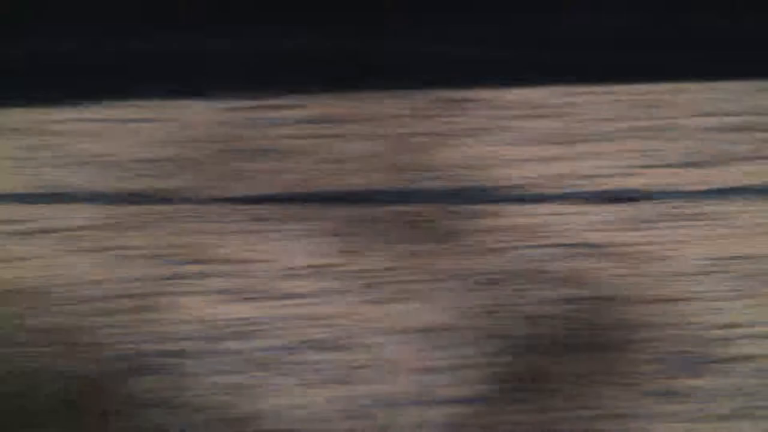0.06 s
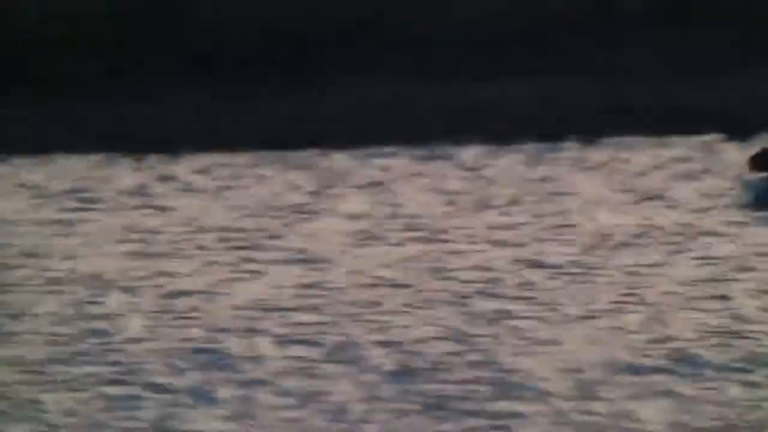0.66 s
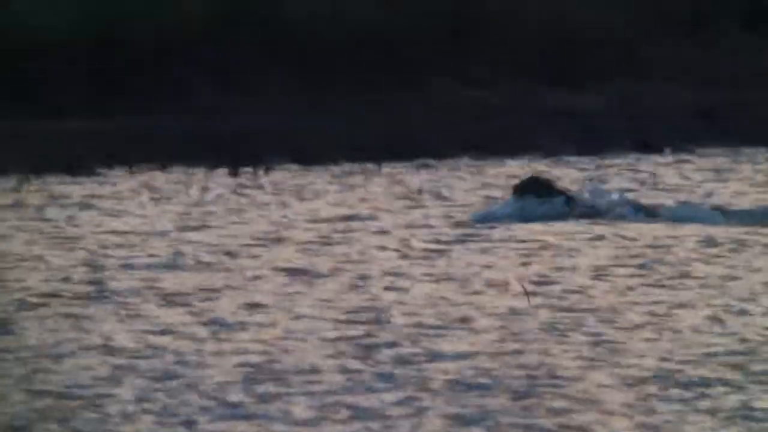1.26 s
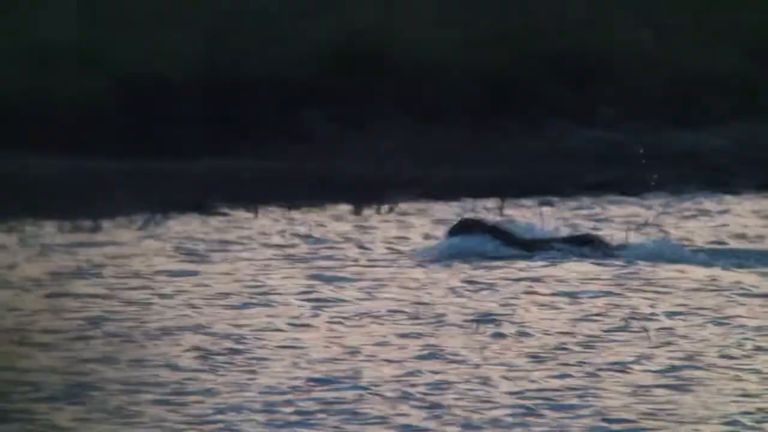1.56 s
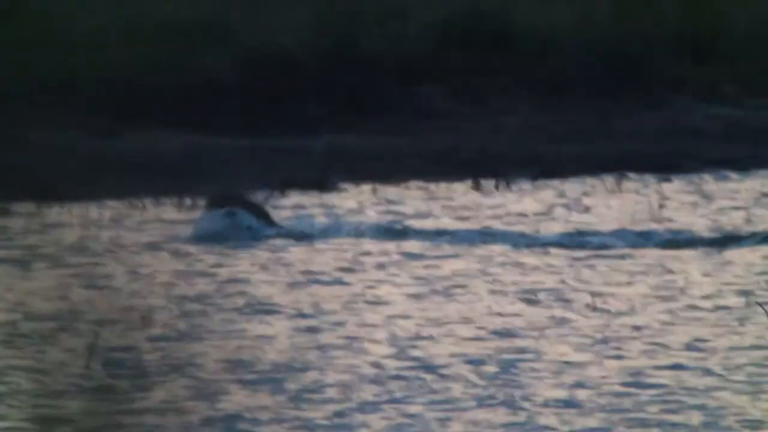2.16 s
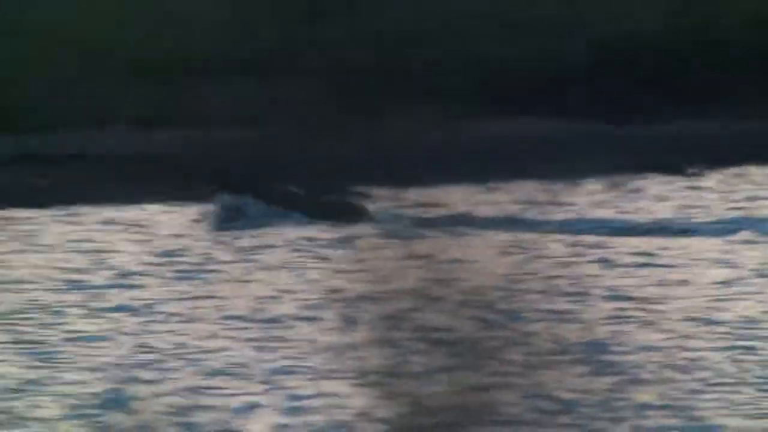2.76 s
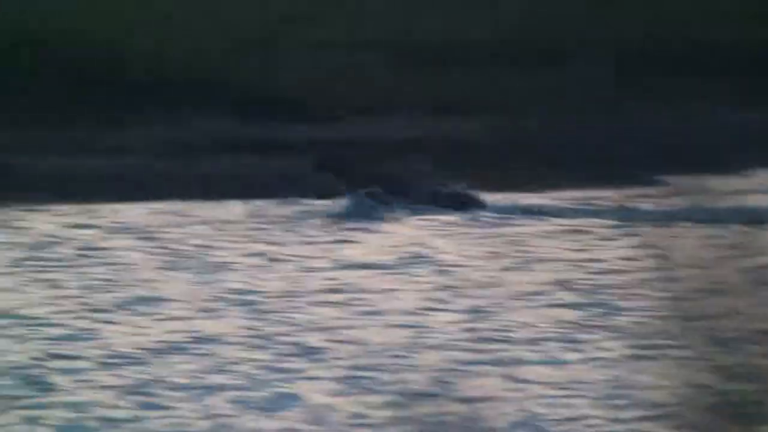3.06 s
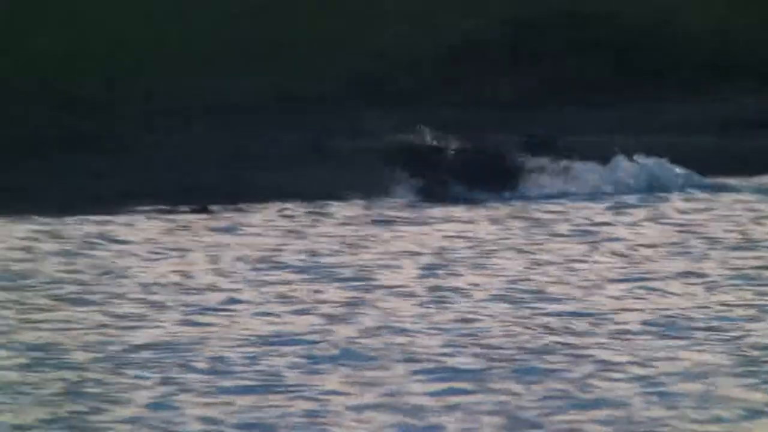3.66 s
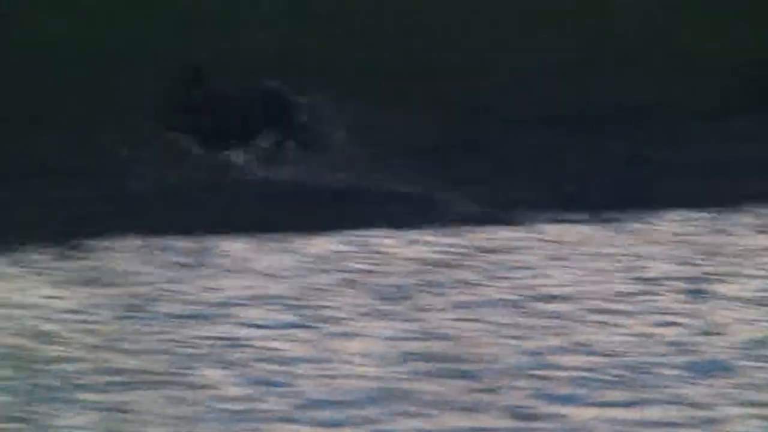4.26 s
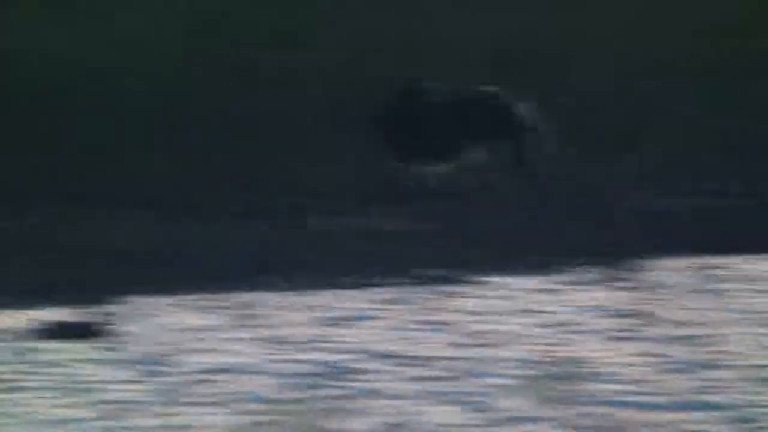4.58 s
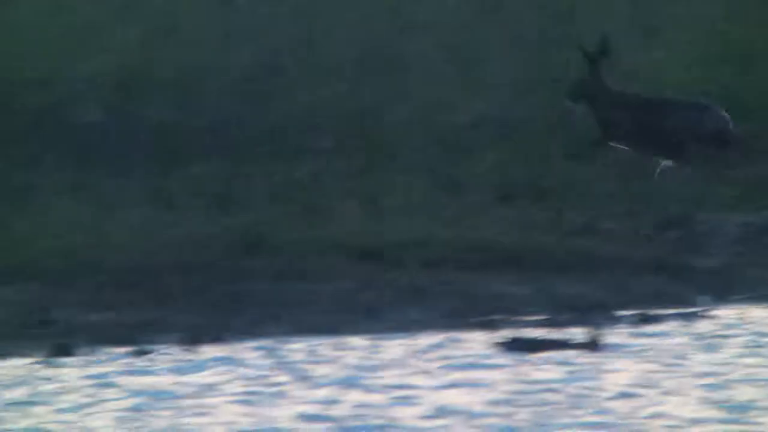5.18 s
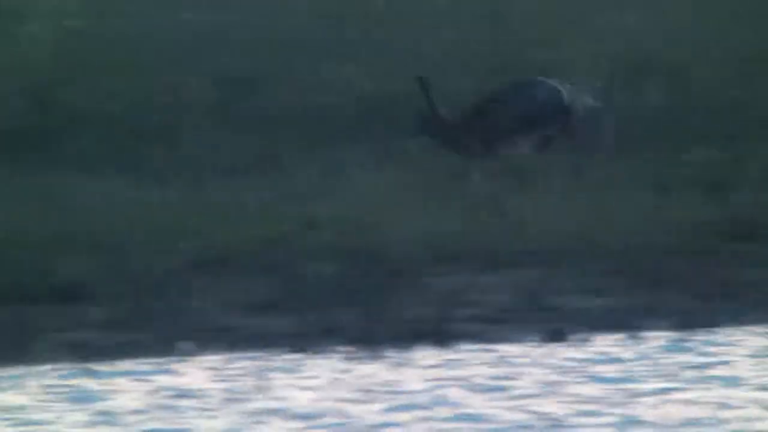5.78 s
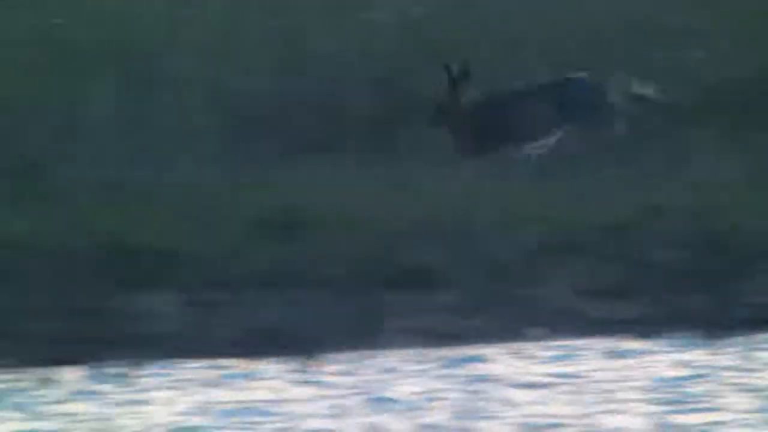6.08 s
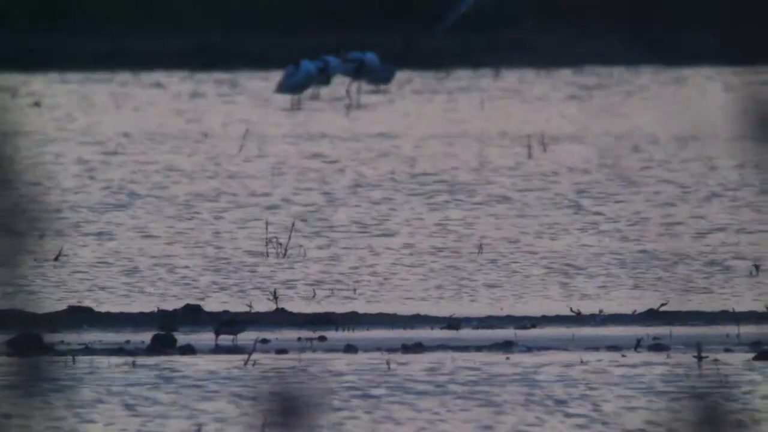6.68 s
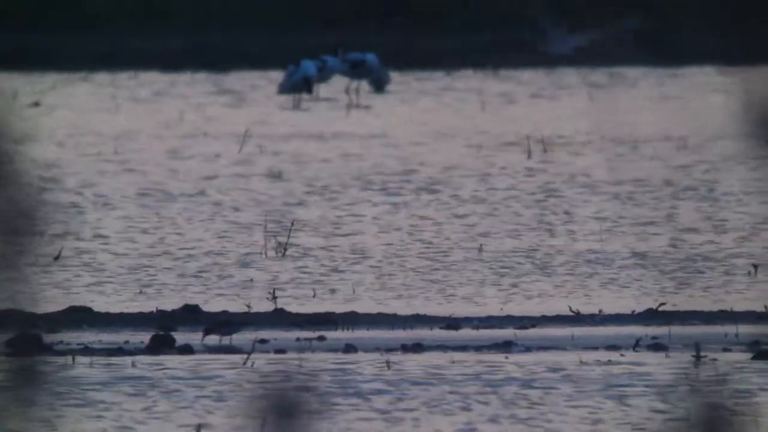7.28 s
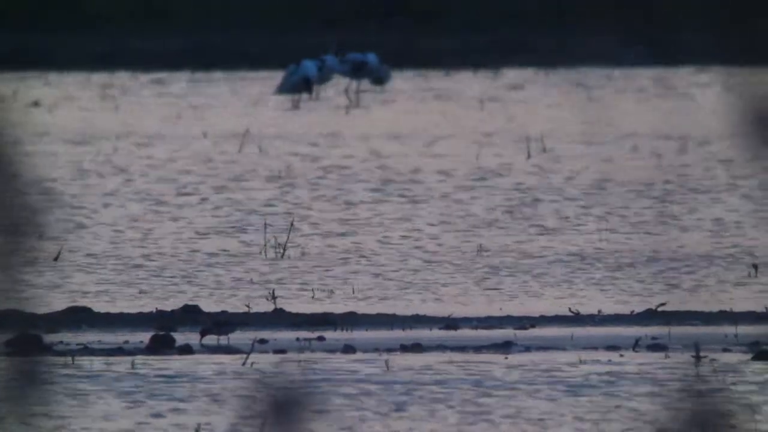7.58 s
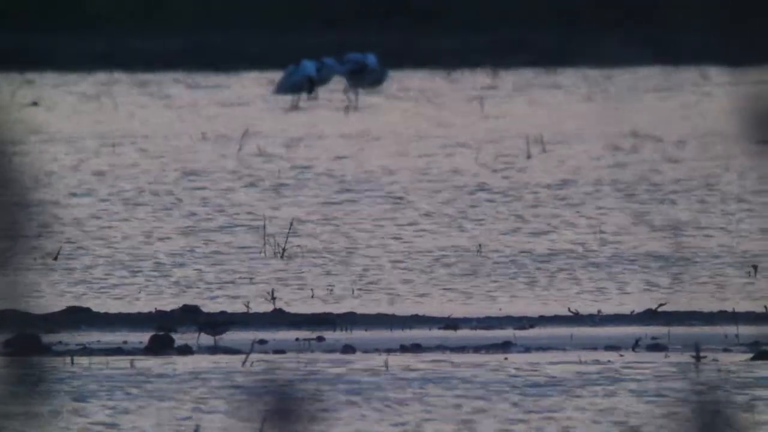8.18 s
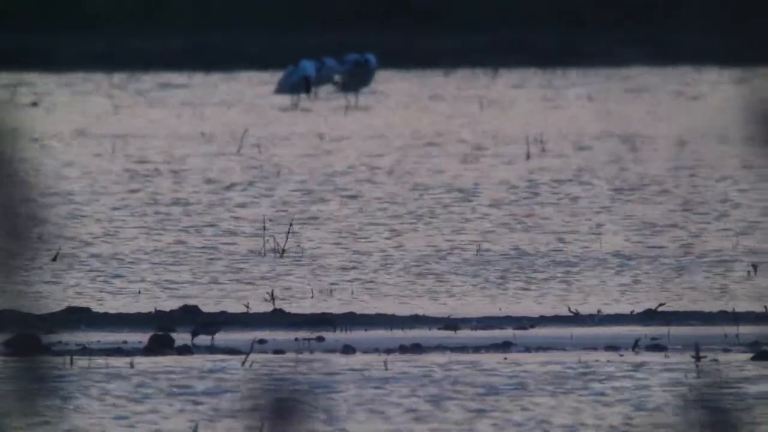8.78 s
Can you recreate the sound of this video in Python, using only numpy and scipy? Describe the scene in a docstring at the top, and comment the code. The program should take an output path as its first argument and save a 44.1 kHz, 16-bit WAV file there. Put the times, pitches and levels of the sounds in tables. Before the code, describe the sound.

The sound fades in on a lake shore with a steady low rumble, faint hiss and a distant chorus of toads, a few soft trills standing out. From the start until about 2.6 seconds, a wading bird gives six short, pure, rising whistles, roughly half a second apart. Wind buffets the microphone from 1.3 to 4.2 seconds with a low roar and fluttering thumps, the loudest part; a few weaker thumps follow until 6 seconds. A tiny tick comes near 1.9 seconds. Faint bird calls sound far off around 4 and 5 seconds. Just after 6 seconds the sound cuts out and quickly fades back in. The toads are now much nearer: two trade short, pulsing trills on the left over a louder chorus until the end, around 9 seconds. Distant water birds cry hoarsely near 6.8 and 7.5 seconds, among faint, thin pips from small birds.

```python
"""Toads at a lake at dusk

Toads trill along the shore, each pulse making a throat sac ring. A wading bird gives six rising
whistles, and other birds call far off. Gusts buffet the microphone over a distant rumble and faint hiss.
The sound fades in, later cuts out and fades in again; after that the toads are much nearer."""
import sys
import numpy as np
from scipy import signal
from scipy.fft import rfft, irfft, next_fast_len
from scipy.io import wavfile
from scipy.ndimage import uniform_filter1d, map_coordinates

SR = 44100
rng = np.random.default_rng(int(sys.argv[2]) if len(sys.argv) > 2 else 0)


def output_pcm(signal):
    """Save a mono or channel-first signal as 16-bit PCM at the path in sys.argv[1].

    Samples are clipped to [-1, 1] before scaling.
    """
    pcm = np.clip(np.atleast_2d(signal).T, -1, 1) * 32767
    wavfile.write(sys.argv[1], SR, np.round(pcm).astype(np.int16))


N = 398663

# Levels in the tables are relative: the functions add their own gains.
# tone colour of the distant rumble and of the microphone hiss: f/Hz, level/dB
RUMBLE_COLOUR = [(15, -42), (25, -29), (38, -5.5), (60, -2), (80, 2), (113, -4), (155, -7), (220, -12.5),
                 (390, -12.5), (650, -25), (900, -32), (1200, -48.5), (2600, -100)]
HISS_COLOUR = [(400, -2.5), (900, 2), (2400, 4.5), (3800, -0.5), (5200, -0.5), (7000, 1.5), (8200, -0.5),
               (9000, 0), (10000, 0), (11200, -.5), (12800, -2), (14500, -3), (16000, -8)]
# how alike the background is on the left and right: f/Hz, likeness (1 = the same)
LIKENESS = [(130, 1), (290, .97), (640, .8), (1410, .55), (3100, .1), (6800, -.08)]
# the background leans to the right: f/Hz, left minus right/dB
BALANCE = [(200, 0), (380, -1), (700, -2.5), (1300, -3), (4400, -2.5), (8100, -.6), (15000, -1)]
# ringing tones of a tiny hard tick on the camera: f/Hz, level/dB, time to fall 60 dB/s
TICK_TONES = [(2000, -19, 0.0039), (3780, -14, 0.0039), (6160, 0, 0.0019), (7400, 2, 0.0019),
              (9200, -9, 0.0058), (11000, -5, 0.0039), (14500, -4, .003)]
# strength of four gusts, one list each: t/s, level/dB
GUSTS = [
    [(1.3, -49), (1.364, -54), (1.378, -47), (1.53, -36), (1.596, -48), (1.66, -39.5), (1.8, -40.5)],
    [(1.8, -42), (1.838, -31.5), (2.092, -36.5), (2.434, -30), (2.47, -35), (2.94, -37.5), (2.97, -44)],
    [(2.97, -45), (3.04, -30.5), (3.126, -38.5), (3.262, -26.5), (3.296, -31.5), (3.396, -33.5),
     (3.47, -61)],
    [(3.47, -56), (3.512, -35), (3.856, -38), (3.972, -45), (3.998, -34), (4.188, -54), (4.2, -45)],
]
# tone colour of the wind's low roar and of the flutter that strong wind adds: f/Hz, level/dB
ROAR_COLOUR = [(15, -37), (25, -17), (42, -11), (70, 2), (130, 1.5), (200, -3.5), (300, -17), (450, -29),
               (800, -51), (1500, -94)]
FLUTTER_COLOUR = [(70, -23), (150, 3), (260, 0.5), (380, -9), (550, -17), (750, -26), (1000, -39),
                  (2000, -90)]
# single strong eddies (swirls of air): t/s, level/dB, f/Hz
STRONG_EDDIES = [(1.67, -23, 292), (1.737, -21.5, 120), (1.844, -13.5, 174), (1.89, -15, 150),
                 (2.003, -17.5, 180), (2.217, -16, 166), (2.273, -16, 204), (2.304, -16, 274),
                 (2.373, -16, 160), (2.41, -22, 262), (2.544, -18, 236), (2.648, -16, 129),
                 (2.74, -18.5, 129), (3.038, -14, 211), (3.23, -15, 258), (3.256, -11.5, 290),
                 (3.544, -16.5, 168), (3.688, -18.5, 261), (3.74, -17.5, 130), (3.813, -15, 214),
                 (3.996, -18.5, 144), (4.343, -25, 117), (4.76, -27.5, 110), (4.839, -21.5, 129),
                 (4.9, -28.5, 110), (5.63, -29.5, 100), (5.954, -22, 130), (6.023, -23.5, 130)]
# hoarse cries of far water birds: t/s, length/s, first f/Hz, last f/Hz, level/dB
BIRD_CRIES = [(4.012, .12, 1800, 2040, -63), (5.148, 0.176, 2020, 2100, -71),
              (6.6, 0.47, 1143, 1162, -68.5), (6.617, .25, 3880, 3880, -75),
              (6.823, .21, 1986, 1816, -57.5), (7.546, .176, 1866, 1980, -55.5),
              (7.661, 0.29, 2890, 2670, -69.5)]
# thin pips of small birds: t/s, first f/Hz, level/dB
BIRD_PIPS = [(4.83, 3000, -71), (6.058, 3200, -75), (6.754, 3400, -69), (7.355, 5600, -77),
             (7.42, 4900, -75), (8.915, 6050, -75), (8.949, 4700, -75)]
# the wading bird's whistles: t/s, f/Hz at the top of the arch, level/dB
WADER_WHISTLES = [(.11, 2600, -57), (.519, 2584, -52), (.955, 2560, -53), (1.432, 2600, -59.5),
                  (1.959, 2523, -54), (2.536, 2533, -56.5)]
# shape of one whistle: share of its length, pitch ratio, level/dB
WHISTLE_SHAPE = [(0, .66, -22.5), (.12, .72, -11), (.24, .865, -11), (.33, .91, -3.5), (.58, 0.98, -1.5),
                 (.74, 1, 0.5), (.92, .95, -2), (1, 1.16, -12)]
# loudness of the far toads together: t/s, level/dB
CHORUS_LEVEL = [(.2, -66), (3.1, -63), (5, -66), (6.1, -64), (6.3, -59), (6.85, -56), (7.35, -59),
                (7.78, -55), (7.98, -61.5), (8.25, -57), (8.48, -61), (8.75, -57.5), (9.04, -58.5)]
# their tone colour across the water: f/Hz, level/dB
CHORUS_COLOUR = [(700, -21.5), (1150, -14), (1330, -9), (1520, -2), (1720, -3), (1900, -6), (2100, -8.5),
                 (2300, -14), (2850, -16.5), (3500, -18), (4600, -22), (6000, -30.5), (9000, -60)]
# each single toad's voice, by name (middle, deep and high are far off, lead and neighbour near): f/Hz, pulse
# rate/Hz, timing scatter (0-1), left minus right/dB
TOAD_VOICES = {"lead": (1625, 59, .13, 5), "neighbour": (1650, 71, .12, 7.4), "middle": (1596, 69, 0.2, -4),
               "deep": (1522, 68, 0, -5), "high": (1750, 65, 0.1, -4.5)}
# single toads' trills, faint far ones (middle, deep, high) and near ones (lead, neighbour): toad, t/s,
# length/s, level/dB
TOAD_TRILLS = [("middle", .097, .14, -63), ("middle", .386, .25, -67), ("middle", .87, .3, -60),
               ("deep", 1.442, .33, -60.5), ("deep", 2.0, .27, -68.5), ("deep", 2.417, .31, -68.5),
               ("deep", 2.878, .34, -67.5), ("deep", 3.55, 0.28, -67.5), ("high", 2.714, 0.24, -68),
               ("high", 5.127, 0.25, -69), ("high", 5.578, .26, -69), ("lead", 6.298, .05, -51.5),
               ("lead", 6.38, .276, -51), ("lead", 6.859, .18, -50.5), ("lead", 7.058, .128, -50),
               ("lead", 7.389, .37, -51.5), ("lead", 7.958, 0.108, -52.5), ("lead", 8.092, .24, -51),
               ("lead", 8.516, 0.27, -51), ("lead", 8.998, .08, -49), ("neighbour", 6.19, .12, -58.5),
               ("neighbour", 6.621, 0.35, -58.5), ("neighbour", 7.189, .21, -62),
               ("neighbour", 7.72, .18, -57.5), ("neighbour", 8.163, 0.25, -56.5),
               ("neighbour", 8.76, .24, -57)]
# the two fade-ins: t/s, time constant/s
FADES = [(.078, .07), (6.157, .065)]


def amp(db):
    """Turn decibels into a gain."""
    return 10 ** (np.asarray(db) / 20)


def unit(x):
    """Scale x to an average strength (rms) of 1."""
    return x / np.sqrt(np.mean(x ** 2) + 1e-20)


def along(points, hz):
    """Read a table of (f/Hz, value) on a log frequency axis."""
    f, v = np.transpose(points)
    return np.interp(np.log(hz + 1), np.log(f + 1), v)


def wobble(rate, size=N):
    """A smooth curve through `rate` random values a second."""
    return map_coordinates(rng.standard_normal(int(size * rate / SR) + 4), [np.arange(size) * rate / SR])


def filtered(x, response):
    """Scale each frequency in x by response(hz)."""
    size = next_fast_len(N + SR // 4)
    return irfft(rfft(x, size) * response(np.fft.rfftfreq(size, 1 / SR)), size)[..., :N]


def add(track, s, sound, pan_db=0):
    """Mix a sound into a stereo track at time s; positive pan is left."""
    start = max(round(s * SR), 0)
    part = track[:, start:start + sound.shape[-1]]
    part += amp([[pan_db / 2], [-pan_db / 2]]) * sound[..., :part.shape[1]]


def noise(colour, likeness=LIKENESS):
    """Stereo noise with a given tone colour and left-right likeness."""
    def response(hz):
        angle = np.arccos(np.clip(along(likeness, hz), -1, 1)) / 2
        return amp(along(colour, hz)) * [np.cos(angle), np.sin(angle)]
    mid, side = filtered(rng.standard_normal((2, N)), response)
    return unit(np.array([mid + side, mid - side]))


def rumble(db=-45.6):
    """A low, distant noise that wavers a little."""
    return amp(db + .45 * wobble(2.84)) * noise(RUMBLE_COLOUR)


def hiss(db=-66.6):
    """The microphone's own steady noise."""
    return amp(db) * noise(HISS_COLOUR)


def tick(start_s=1.9036, gain_db=-27):
    """One sharp contact rings for a few milliseconds."""
    out = np.zeros((2, N))
    t = np.arange(SR // 50) / SR
    tones = [(-1) ** k * amp(db - 60 * t / t60) * np.sin(2 * np.pi * hz * t)
             for k, (hz, db, t60) in enumerate(TICK_TONES)]
    add(out, start_s, amp(gain_db) * sum(tones), pan_db=-2)
    return out


def add_eddy(track, s, db, hz, chance, cycles=.52):
    """An eddy is a short pressure swing around time s; each side of the microphone feels its own."""
    t = np.arange(-SR // 50, SR // 50) / SR
    envelope = 1 / np.cosh(np.clip(2 * hz * t / cycles, -30, 30))
    swings = -np.cos(2 * np.pi * hz * t + chance[:2, None]) * envelope
    add(track, s + t[0], amp(db) * swings, pan_db=-3 * chance[2])


def wind_force(gust_db=-1, wake_db=-16, rise_db_per_s=900, fall_db_per_s=250):
    """Wind strength in dB: the gusts, plus a quick surge around each strong eddy."""
    t = np.arange(N) / SR
    gusts = [np.interp(t, *np.transpose(rows), left=-90, right=-90) for rows in GUSTS]
    force = np.max(gusts, axis=0) + gust_db
    for s, db, _ in STRONG_EDDIES:
        drop_db = np.maximum(rise_db_per_s * (s - t), fall_db_per_s * (t - s))
        force = np.maximum(force, db + wake_db - drop_db)
    return uniform_filter1d(force, size=600)


def wind(roar_db=-2, flutter_db=-9.5, strong_db=-34, eddy_count=190, eddy_hz=230):
    """Air swirls at the microphone: a roar and small eddies. Stronger wind sounds brighter."""
    force = wind_force()
    lumps = amp(2.9 * wobble(55))
    roar = unit(lumps * noise(ROAR_COLOUR, likeness=[(50, .9), (130, .85), (300, .15)]))
    flutter = unit(lumps * noise(FLUTTER_COLOUR, likeness=[(200, .25), (600, -.21)]))
    excess_db = np.clip(force - strong_db, -8, 3)
    out = amp(force) * (amp(roar_db) * roar + amp(flutter_db + .96 * excess_db) * flutter)
    for s in np.linspace(GUSTS[0][0][0], STRONG_EDDIES[-1][0], eddy_count):
        chance = rng.uniform(-1, 1, 6)
        shift, pitch, strength = chance[3:]
        at = int((s + .012 * shift) * SR)
        hz = eddy_hz * 2 ** (.4 * pitch + .08 * excess_db[at])
        add_eddy(out, at / SR, force[at] + 2 + 4.2 * strength, hz, chance[:3])
    return out


def thumps(delay_s=.00616, gain_db=-4.5):
    """The strongest eddies stand out as thumps."""
    out = np.zeros((2, N))
    for s, db, hz in STRONG_EDDIES:
        add_eddy(out, s + delay_s, db + gain_db, hz, rng.uniform(-1, 1, 3))
    return out


def cry(length_s, first_hz, last_hz, hoarse, octave_db=-18):
    """A gliding tone; the hoarser it is (0-1), the more its pitch and strength shake."""
    size = int(length_s * SR)
    hz = np.linspace(first_hz, last_hz, size) * (1 + .07 * hoarse * wobble(600, size))
    phase = 2 * np.pi * np.cumsum(hz) / SR
    tone = np.sin(phase) + hoarse * amp(octave_db) * np.sin(2 * phase)
    shake = amp(3.4 * hoarse * wobble(199, size))
    return unit(tone * shake) * signal.windows.tukey(size, .7)


def far_birds(pip_s=.058, pan_db=-4):
    """Hoarse cries and thin falling pips, a little to the right."""
    out = np.zeros((2, N))
    for start, length, first_hz, last_hz, db in BIRD_CRIES:
        add(out, start, amp(db) * cry(length, first_hz, last_hz, hoarse=.94), pan_db)
    for start, hz, db in BIRD_PIPS:
        add(out, start, amp(db) * cry(pip_s, hz, .93 * hz, hoarse=.45), pan_db)
    return out


def wading_bird(length_s=.11, flutter_db=1.7):
    """Each pure whistle slides up, arches and ends with an upward flick."""
    out = np.zeros((2, N))
    share, pitch, shape_db = np.transpose(WHISTLE_SHAPE)
    size = int(length_s * SR)
    progress = np.linspace(0, 1, size)
    for start, arch_hz, db in WADER_WHISTLES:
        hz = arch_hz * np.interp(progress, share, pitch) * (1 + .0069 * wobble(302, size))
        tone = np.sqrt(2) * np.sin(2 * np.pi * np.cumsum(hz) / SR)
        gain = amp(db + np.interp(progress, share, shape_db) + flutter_db * wobble(46.6, size))
        add(out, start, gain * tone * signal.windows.tukey(size, .08))
    return out


def trill(length_s, hz, rate, scatter, rise_s=.0034, overtone_db=-23.5):
    """A run of pulses; each makes the toad's throat sac swell and ring for a few milliseconds."""
    timing, pitch, offset, strength, stretch = rng.standard_normal((64, 5)).T[..., None]  # a row a pulse
    gaps = np.clip(1 + scatter * timing, .5, 2)
    starts = np.concatenate([[0], np.cumsum(gaps[:-1])]) / rate
    t = np.arange(SR // 64) / SR
    swell = (t / rise_s * np.exp(1 - t / rise_s)) ** 4.6
    sag = 1 + .024 * (1 - t / rise_s / 2)  # the pitch falls as each pulse dies
    phase = 2 * np.pi * hz * t * sag * (1 + .018 * pitch) + np.pi * offset
    overtone = amp(overtone_db) * np.sin(1.78 * (1 + .055 * stretch) * phase)
    pulses = amp(1.1 * strength) * swell * (np.sin(phase) + overtone)
    sounding = starts < length_s
    where = (starts[sounding, None] * SR).astype(int) + np.arange(len(t))
    size = int(length_s * SR) + SR // 100
    return unit(np.bincount(where.ravel(), pulses[sounding].ravel(), size))  # add each pulse in place


def far_toads(count=44, hz=1640, pulsed_db=-4, blurred_db=-.5):
    """Many trills overlap; the farthest blur into a band of noise."""
    voices = np.zeros((2, N))
    for k, (shift, length, pitch, rate, side) in enumerate(rng.uniform(-1, 1, (count, 5))):
        call = trill(.4 + .13 * length, hz * (1 + .09 * pitch), 64 + 8 * rate, scatter=.1)
        add(voices, (k + shift / 2) / count * N / SR, call, pan_db=5 * side)
    blur = noise(CHORUS_COLOUR) * amp(.9 * wobble(7))
    level_db = np.interp(np.arange(N) / SR, *np.transpose(CHORUS_LEVEL))
    return amp(level_db) * (amp(pulsed_db) * unit(voices) + amp(blurred_db) * blur)


def single_toads():
    """Five toads stand out; each trill gathers strength and eases just before it stops."""
    out = np.zeros((2, N))
    for toad, start, length, db in TOAD_TRILLS:
        hz, rate, scatter, pan_db = TOAD_VOICES[toad]
        call = trill(length, hz, rate, scatter)
        effort_db = np.interp(np.linspace(0, 1, len(call)), [0, .5, .8, 1], [-2, 1, 1, -2])
        add(out, start, amp(db + effort_db) * call, pan_db)
    return out


def shore_echo(calls, decay_s=.18):
    """The banks scatter the calls into a short, soft echo."""
    t = np.arange(SR // 2) / SR
    tail = rng.standard_normal((2, len(t))) * amp(-60 * t / decay_s)
    tail /= np.linalg.norm(tail[0])
    return signal.fftconvolve(calls.mean(axis=0)[None], tail, axes=1)[:, :N]


def scene():
    """Toads and birds over the evening's background, with wind close up."""
    toads, whistles, cries = single_toads(), wading_bird(), far_birds()
    echo = shore_echo(amp(-17) * toads + amp(-23) * whistles + amp(-5) * cries)
    background = rumble() + far_toads() + hiss()
    background = filtered(background, lambda hz: amp(np.outer([.5, -.5], along(BALANCE, hz))))
    return background + tick() + wind() + thumps() + echo + cries + whistles + toads


def record(dry, floor_db=-54, top_hz=15900):
    """The sound twice fades in from near silence, and the highest treble is cut off."""
    t, fade = np.arange(N) / SR, np.zeros(N)
    for start, fade_s in FADES:
        after = t >= start
        fade[after] = 1 - np.exp(-(t[after] - start) / fade_s)
    return filtered(dry * (fade + amp(floor_db)), lambda hz: hz < top_hz)


dry = scene()
out = record(dry)
output_pcm(out)
```